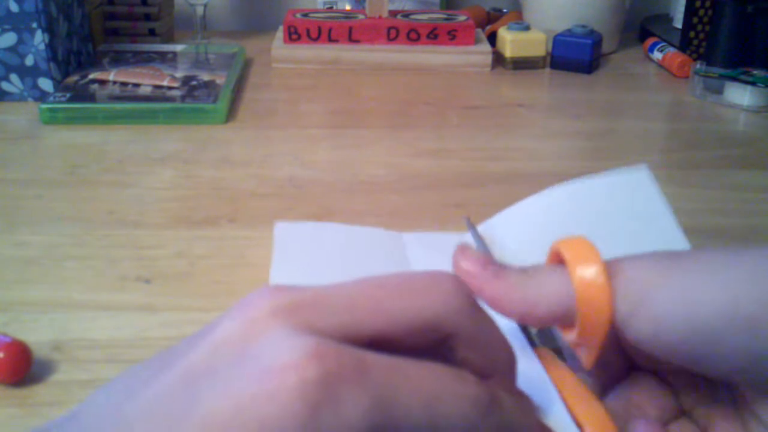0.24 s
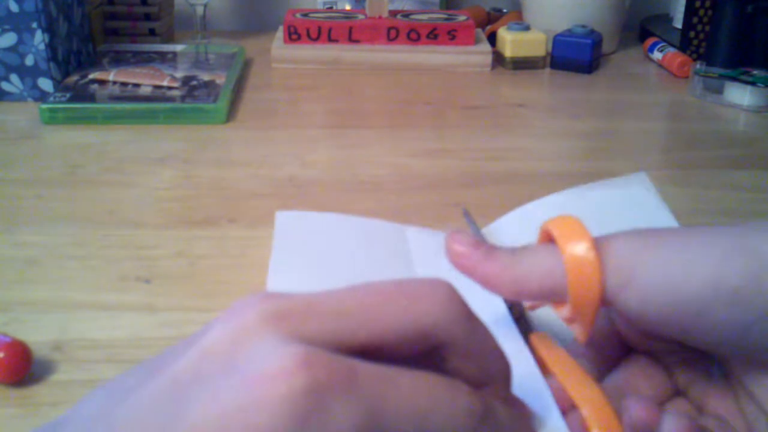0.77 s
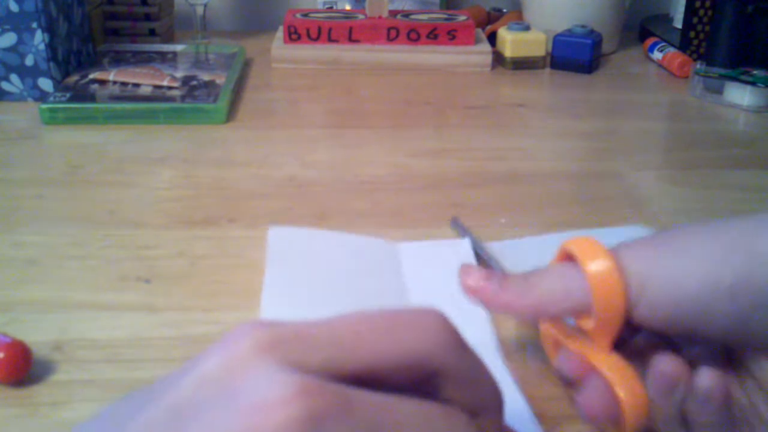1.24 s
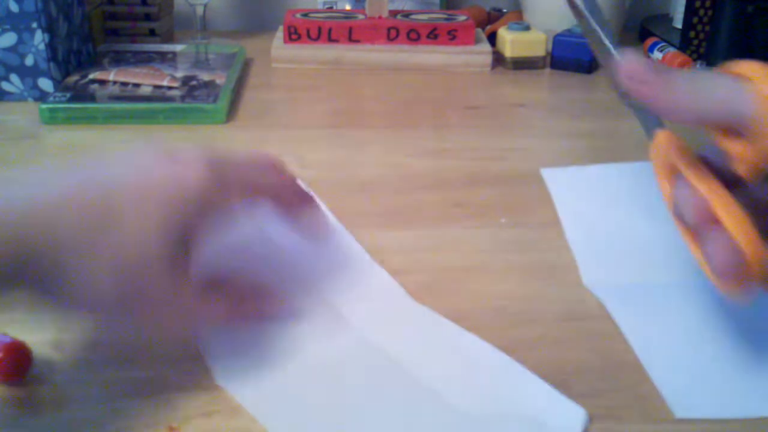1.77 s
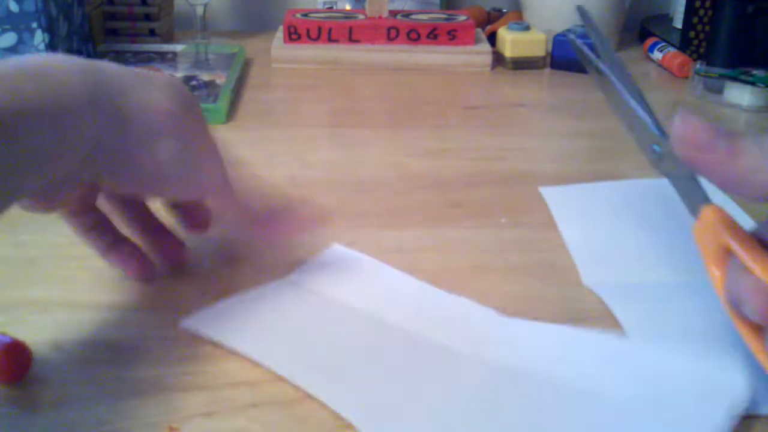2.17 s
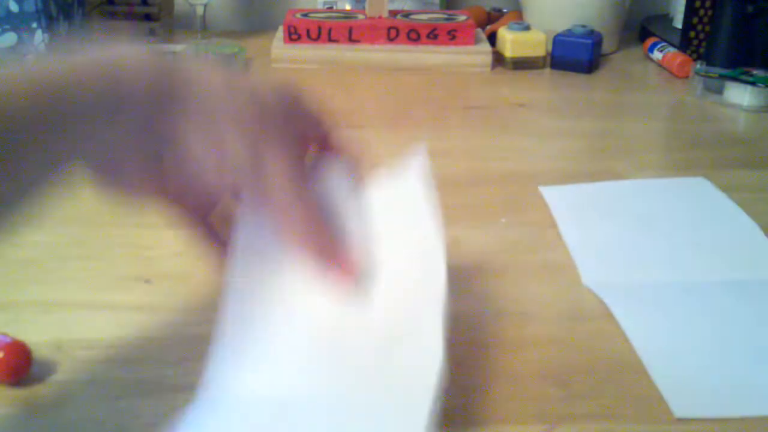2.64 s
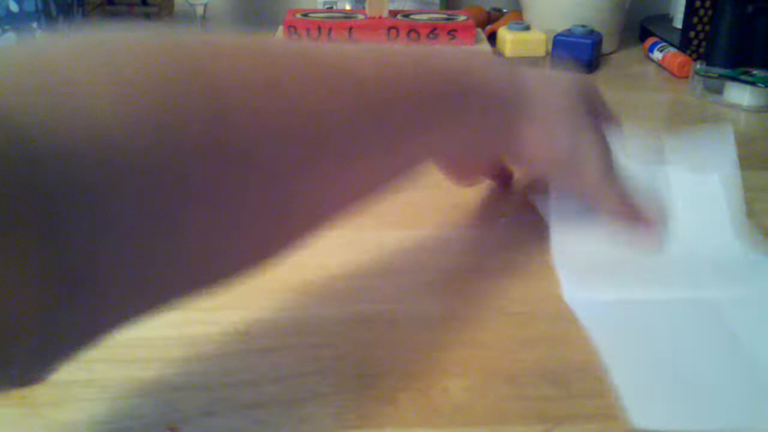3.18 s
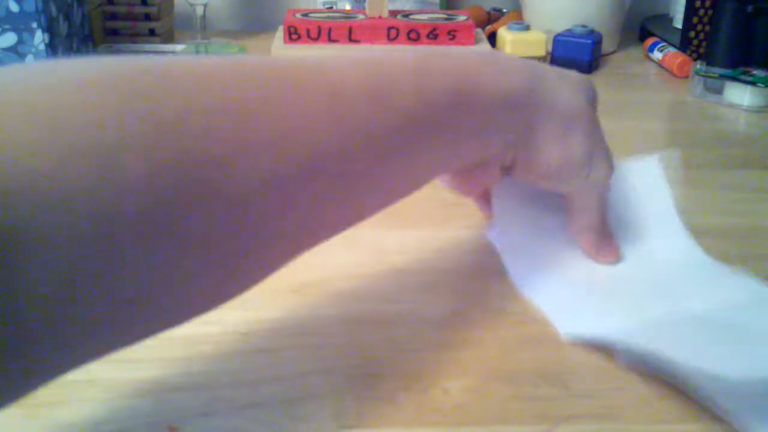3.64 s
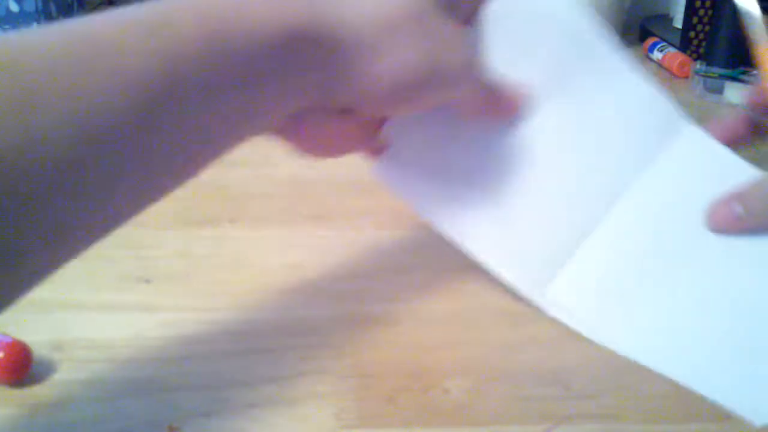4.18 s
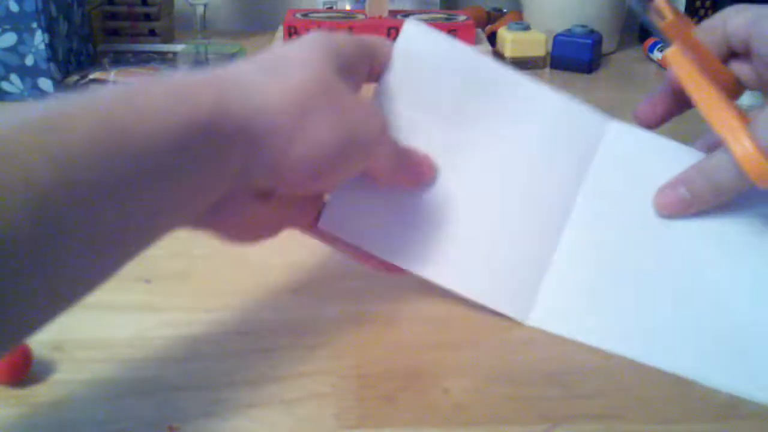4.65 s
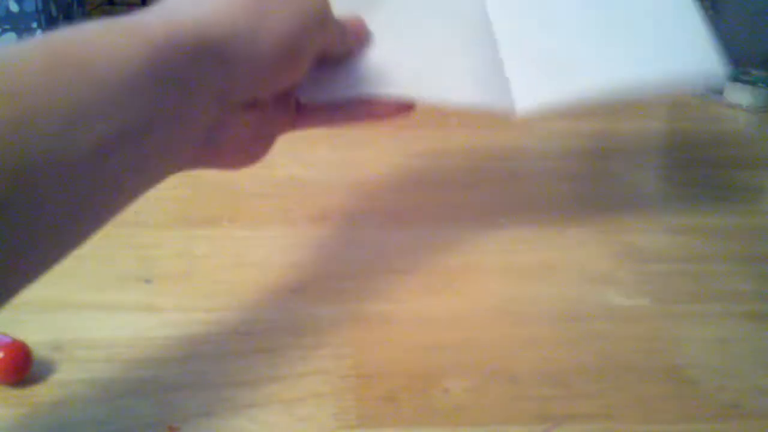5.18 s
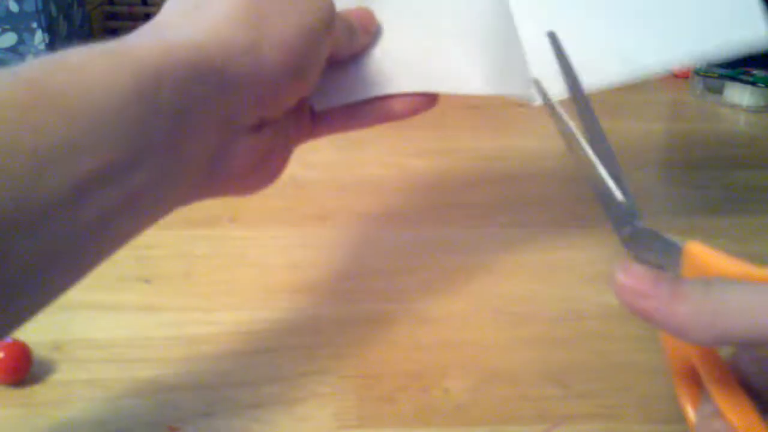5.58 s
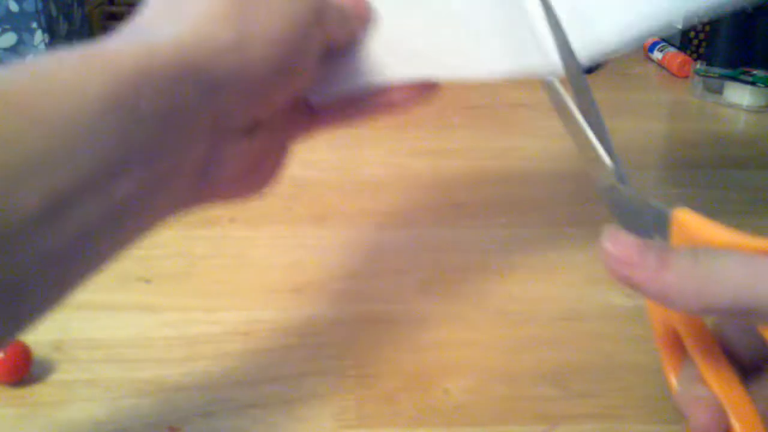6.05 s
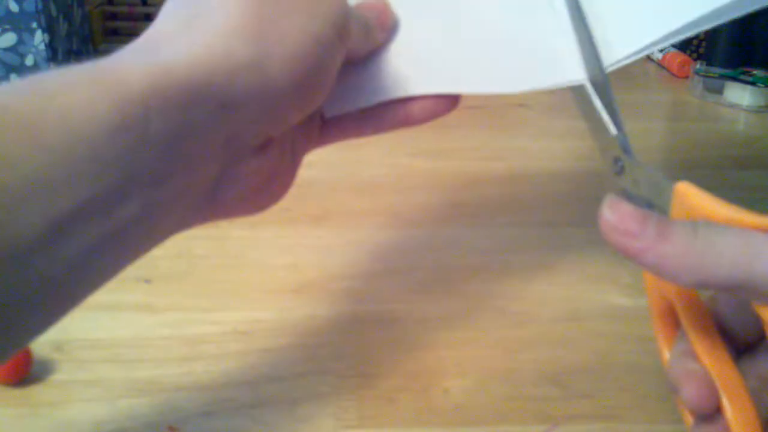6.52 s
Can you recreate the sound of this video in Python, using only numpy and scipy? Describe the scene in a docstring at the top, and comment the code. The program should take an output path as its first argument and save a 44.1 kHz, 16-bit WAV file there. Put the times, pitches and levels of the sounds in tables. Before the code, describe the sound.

Close to a small microphone in a quiet room, scissors crunch through paper four times, with sharp clicks from the blades. Paper then flaps and hisses as it is slid across a wooden table. Midway the handling grows louder, with a cluster of dull knocks, the rub of an arm and a sharp crease snap. Lighter flaps and rustles follow as the sheets are turned, fading toward a faint background hush.

```python
"""Over a faint hush, scissors make four cuts along a folded sheet on a wooden table: fibres tear and the
blades ring and bite. From about one second an arm drags on the wood, and the sheets flap and are slid,
picked up, stacked and turned; paper hisses over paper and wood, creases snap and the table is knocked.
A small close microphone is spread to two channels: the right is roughly the left, inverted and late."""
import sys
import numpy as np
from scipy import signal
from scipy.fft import rfft, irfft, next_fast_len
from scipy.io import wavfile
from scipy.ndimage import uniform_filter1d

SR = 44100
rng = np.random.default_rng(int(sys.argv[2]) if len(sys.argv) > 2 else 0)


def transcribe(u):
    """Save the signal u as a 16-bit wav file named by the first command-line argument.

    u: samples, shape (n,) or (channels, n), limited to [-1, 1]; the rate is SR.
    q: integer samples, one column per channel.
    """
    v = np.clip(np.atleast_2d(u).T, -1, 1)
    q = np.round(v * 32767).astype(np.int16)
    wavfile.write(sys.argv[1], SR, q)


N = 299880


def from_db(db):
    """The decibel scale: amplitude grows tenfold every 20 dB."""
    return 10 ** (np.asarray(db) / 20)


def unit_rms(x):
    """Normalisation to a mean power of 1."""
    return x / np.sqrt(np.mean(x ** 2) + 1e-20)


def band_pass(x, low_hz, high_hz):
    """Butterworth filtering: frequencies outside the band fall away."""
    edges = np.clip([low_hz, high_hz], 10, .45 * SR)
    return signal.sosfilt(signal.butter(2, edges, "band", fs=SR, output="sos"), x)


def drift(time_s):
    """Low-passed noise: a slow random fluctuation of rms 1."""
    pole = np.exp(-1 / (time_s * SR))
    return unit_rms(signal.lfilter([1], [1, -2 * pole, pole * pole], rng.standard_normal(N + 8000))[8000:])


def resonate(x, modes, wander_db=0):
    """Modal superposition: damped resonances add with alternating signs; their strengths may wander."""
    out = 0
    for k, (hz, width_hz, db) in enumerate(modes):
        r = np.exp(-np.pi * width_hz / SR)
        level_db = db + wander_db * drift(time_s=0.018) if wander_db else db
        poles = [2, -4 * r * np.cos(2 * np.pi * hz / SR), 2 * r * r]
        out = out + (-1) ** k * from_db(level_db) * signal.lfilter([1 - r * r, 0, r * r - 1], poles, x)
    return out


def texture(force, modes, low_hz, high_hz):
    """Forced vibration at steady power: each mode swells and sinks on its own as the sheet bends."""
    rung = band_pass(resonate(force, modes, wander_db=2.5), low_hz, high_hz)
    power = uniform_filter1d(np.mean(rung ** 2, axis=0), round(0.038 * SR))
    return rung / np.sqrt(np.maximum(power, 1e-20))


def grains(per_s, spread_db, clump_db, clump_s):
    """Shot noise: two trains of random clicks of either sign, their uneven sizes swelling in clumps."""
    size_db = spread_db * np.minimum(rng.standard_exponential((2, N)), 4) + clump_db * drift(clump_s)
    chance = rng.uniform(-1, 1, (2, N))
    born = np.abs(chance) < per_s / SR
    return np.where(born, np.sign(chance) * from_db(size_db), 1e-18)


def strokes(rows, swell_db):
    """Incoherent addition: strokes swell, hold, fade and add as power, one envelope per level column."""
    power = np.zeros((len(rows[0]) - 4, N))
    for start_s, swell_s, hold_s, fade_s, *top_db in rows:
        start = round(start_s * SR)
        # a fade of zero or less is an abrupt stop
        corners = np.cumsum(np.maximum([0, swell_s, hold_s, 3 * fade_s], 1e-3))
        t = np.arange(min(round(corners[-1] * SR), N - start)) / SR
        shape = from_db(np.interp(t, corners, [-swell_db, 0, 0, -60]))
        power[:, start:start + len(t)] += np.outer(from_db(top_db), shape) ** 2
    return np.sqrt(power)


# The noise floor. Each row: frequency in Hz, relative spectral density in dB.
HUSH_SPECTRUM = [(20, -20), (50, -24), (120, 5.5), (250, 0.5), (500, -5), (1000, -17), (2000, -20),
                 (3500, -21.5), (5300, -27.5), (8000, -21.5), (13500, -21.5)]
def hush():
    """Stationary noise: low room rumble and the microphone's own hiss."""
    hz = np.maximum(np.fft.rfftfreq(N, 1 / SR), 1)
    points_hz, density_db = np.transpose(HUSH_SPECTRUM)
    colour = from_db(np.interp(np.log(hz), np.log(points_hz), density_db))
    return from_db(-61) * unit_rms(irfft(colour * rfft(rng.standard_normal((2, N))), N))


# Resonances of tearing and of rubbed paper. Each row: frequency in Hz, bandwidth in Hz, gain in dB.
CRINKLE_MODES = [(2014, 760, -1.5), (2995, 890, 2), (3850, 1600, 0.5), (4350, 2800, -10)]
HISS_MODES = [(6800, 5900, -1.5), (8880, 1800, 6), (10770, 4100, 2.5), (11550, 1580, 1.5)]
def paper_noise(fibres, crinkle_gain, hiss_gain):
    """Fracture and friction: fibres crinkle, some break singly with a broad tick, and rubbing hisses."""
    breaks = unit_rms(band_pass(grains(140, 1.2, 1.0, 0.011), 950, 10400))
    crinkle = texture(fibres, CRINKLE_MODES, 1180, 13500) + from_db(-6.5) * breaks
    rubbing = grains(6000, 2.1, 1.15, 0.0074) + 0.2 * fibres
    return crinkle_gain * crinkle + hiss_gain * texture(rubbing, HISS_MODES, 4800, 19000)


FIBRE_CLICKS = dict(per_s=1100, spread_db=1.5, clump_db=1.5, clump_s=0.0039)
# Resonances of the blades. Each row: frequency in Hz, bandwidth in Hz, gain in dB.
BLADE_MODES = [(379, 148, 0.13), (620, 190, 0.89), (1130, 137, 0.96), (1290, 78, 0.29), (1390, 51, 1.5),
               (1600, 28, 2.5), (1717, 110, -0.13), (2090, 470, -2.3)]
# Bites of the scissors. Each row: start, swell and hold in seconds, then tearing, hiss and blades in dB.
BITES = [(0, 0.0008, 0.094, -50.5, -53, -48.5), (0.126, 0.002, 0.0036, -49, -47, -49),
         (0.1534, 0.0012, 0.017, -43.5, -40.5, -46.5), (0.184, .005, 0.015, -47.5, -44, -46),
         (0.2, 0.0024, 0.017, -43, -46.5, -49.5), (0.349, 0.0051, 0.025, -51.5, -55, -54),
         (0.381, 0.0024, 0.0075, -50.5, -56, -49.5), (0.399, 0.028, 0.032, -47, -45, -48.5),
         (0.486, 0.0037, 0.03, -48, -48, -51.5), (0.613, 0.0049, 0.0043, -48.5, -46.5, -49),
         (0.663, 0.054, 0.09, -60.5, -61, -72), (0.744, 0.0012, 0.016, -59, -68, -47.5),
         (0.778, 0.014, 0.034, -49, -53.5, -44.5), (0.842, 0.016, 0.067, -49.5, -53.5, -45.5),
         (0.999, 0.003, 0.0064, -47, -53, -47), (1.03, 0.026, 0.032, -40, -44.5, -41.5),
         (1.089, .003, 0.019, -61, -42, -44.5)]
def scissors():
    """Shear fracture: the same tearing fibres excite both the paper and the blades."""
    fade_s = 0.072  # per 20 dB
    rows = [(start_s, swell_s, hold_s, fade_s, *db) for start_s, swell_s, hold_s, *db in BITES]
    tear_gain, hiss_gain, blade_gain = strokes(rows, swell_db=5.5)
    fibres = grains(**FIBRE_CLICKS)
    return paper_noise(fibres, tear_gain, hiss_gain) + blade_gain * texture(fibres, BLADE_MODES, 200, 1740)


# Blades biting and creases snapping. Each row: start in seconds, peak in dB, treble share in dB.
SNAP_EVENTS = [(0.128, -30.5, 0), (0.1582, -21, -1), (0.172, -22, -3), (0.2045, -23, -11),
               (0.3545, -53, -2), (0.3868, -34, -6), (0.4867, -39, -1), (0.5105, -36, -10),
               (0.6244, -40, -10), (0.7857, -37, -4), (1.1025, -29, -1), (0.75, -45, 0), (1.002, -35, -5.5),
               (1.0337, -37, -3), (1.068, -33, -10), (1.737, -37, 4), (1.8687, -47, -9), (1.952, -24, 1.5),
               (2.148, -47.5, -6), (2.4175, -38, 1), (2.4255, -33.5, -8), (2.4543, -28.5, -20),
               (2.502, -30.5, -16), (2.561, -37, -1), (2.598, -35, 0), (2.6096, -29, -2.5),
               (2.6367, -30.5, 7), (2.706, -35, 1), (2.903, -43, 0), (2.9197, -36.5, 0), (2.942, -43, -8),
               (2.9766, -34.5, -5.5), (3.006, -44, -6), (3.1233, -35.5, -7), (3.333, -43, 5),
               (3.357, -28, -15), (3.453, -27, -19), (3.457, -29, -10), (3.5743, -41, -5),
               (3.5967, -11, -2), (3.5968, -12, -4), (3.8101, -27, -7), (3.8217, -34, -2),
               (3.8359, -31.5, -8), (4.2747, -33, -1.5), (4.285, -31.5, -0.5), (4.406, -35.5, -1),
               (5.129, -24.5, 2), (5.5154, -42.5, -3.5), (6.006, -39, 1)]
def snaps():
    """Sudden release of stress: a crack about 1 ms long, then a weaker crackling tail."""
    crack_t60_s, tail_t60_s, length = 0.0025, 0.052, 4000
    out, t = np.zeros((2, N + length)), np.arange(length) / SR
    decay = from_db(-60 * t / crack_t60_s) + from_db(-13 - 60 * t / tail_t60_s)
    for start_s, peak_db, treble_db in SNAP_EVENTS:
        burst = rng.choice([-1, 1], (2, length)) * decay
        bands = band_pass(burst, 1600, 7200), band_pass(burst, 5050, 14000)
        low, high = (band / np.linalg.norm(band, axis=1, keepdims=True) for band in bands)
        share = min(from_db(treble_db), .98)
        snap = share * high + np.sqrt(1 - share ** 2) * low
        out[:, round(start_s * SR):][:, :length] += from_db(peak_db) * snap / np.abs(snap).max()
    return out[:, :N]


# Resonances of the table top. Each row: frequency in Hz, bandwidth in Hz, gain in dB.
WOOD_MODES = [(91, 53, -2.5), (135, 60, 1), (208, 85, -4.5), (277, 122, -13.5)]
# Arm and hand dragging. Each row: start, swell, hold and fade per 20 dB in seconds, level in dB.
ARM_DRAGS = [(.99, 0.061, 0.24, 0, -53.5), (1.33, 0.048, 0.034, -0.5, -57),
             (1.48, 0.023, 0.16, -1.2, -52.5), (1.7, 0.21, 0.063, 0.1, -60), (2.26, 0.018, 0.046, 1, -57),
             (3.34, 0.017, 0.077, 0.33, -42.5), (3.47, .02, 0.074, 0.14, -42),
             (3.69, 0.012, 0.024, 1.5, -62), (4.07, 0.072, 0.11, -0.46, -49.5),
             (4.4, 0.044, 0.4, -0.8, -65)]
# Knocks on the wood. Each row: time in seconds, peak in dB.
WOOD_KNOCKS = [(1.184, -38), (1.242, -39), (1.265, -50), (1.383, -44), (1.515, -34), (1.621, -43),
               (3.309, -27), (3.330, -22), (3.371, -34), (3.393, -27), (3.417, -29), (3.446, -31),
               (3.601, -36), (3.626, -38), (3.705, -42), (4.151, -38)]
def table_top():
    """Stick-slip friction of skin drives the wood in soft lumps; each knock is an impulse response."""
    slips = grains(300, 1.0, 2.6, 0.0094)
    drags = strokes(ARM_DRAGS, swell_db=4)[0] * unit_rms(resonate(slips, WOOD_MODES))
    pushes = np.full(N, 1e-18)
    for start_s, peak_db in WOOD_KNOCKS:
        pushes[round(start_s * SR)] = from_db(peak_db)
    impulse_response = resonate(signal.unit_impulse(2000), WOOD_MODES)
    knocks = resonate(pushes, WOOD_MODES) / np.abs(impulse_response).max()
    return band_pass(drags + knocks, 21, 610)


# The sheet flapping or tapping the table. Each row: start in seconds, peak in dB, pitch in Hz,
# tail against the push in dB.
FLAP_EVENTS = [(1.13, -29.5, 590, -5), (1.147, -28, 483, -11), (1.156, -28, 540, -8.5),
               (1.182, -36, 695, -7), (2.271, -34, 353, -8.5), (2.374, -39.5, 360, -8),
               (2.609, -33, 1060, -10), (2.672, -44, 500, -13), (2.742, -46, 604, -9),
               (2.775, -40.5, 646, -10), (2.954, -41, 430, -24), (2.9756, -23.5, 710, -11.5),
               (3.357, -41, 905, -5), (3.156, -40, 410, 9), (3.809, -42, 670, 3), (3.997, -35, 390, 2),
               (4.036, -40.5, 610, -6), (4.066, -39.5, 528, -4.5), (4.206, -35, 410, -3),
               (4.455, -43, 370, -8), (4.631, -35.5, 530, -10), (4.813, -40, 313, -18),
               (5.129, -41.5, 720, -28), (5.636, -43, 413, -6), (5.721, -53, 490, 1),
               (6.019, -49.5, 375, -10), (6.244, -44, 440, -12)]
def flaps():
    """Impulsive excitation: a push and a rustle ring the sheet at its momentary pitch and above."""
    push_t60_s, tail_t60_s, tail_rise_s, length = 0.0027, 0.13, 0.0024, 5000
    out, t = np.zeros((2, N + length)), np.arange(length) / SR
    push = from_db(-60 * t / push_t60_s)
    for start_s, peak_db, hz, tail_db in FLAP_EVENTS:
        tail = from_db(tail_db - 60 * t / tail_t60_s) * (1 - np.exp(-t / tail_rise_s))
        force = push + tail * rng.standard_normal((2, length))
        modes = [(hz, 0.43 * hz, 0), (1.87 * hz, 0.59 * hz, -3), (2.0 * hz, 1.72 * hz, -9)]
        flap = band_pass(resonate(force, modes), 180, 5000)
        out[:, round(start_s * SR):][:, :length] += from_db(peak_db) * flap / np.abs(flap).max()
    return out[:, :N]


# Resonances of the whole sheet. Each row: frequency in Hz, bandwidth in Hz, gain in dB.
SHEET_MODES = [(296, 160, -3), (404, 57, 3.5), (471, 107, -1.5), (720, 120, -5), (923, 620, -11),
               (1145, 1060, -10.5)]
# Sheets slid, lifted and turned. Each row: start, swell, hold and fade per 20 dB in seconds,
# then crinkle, hiss and sheet body in dB.
HAND_STROKES = [ (1.16, 0.049, 0.2, 0.36, -64.5, -63.5, -56), (1.26, .11, 0.008, 0.14, -52.5, -47.5, -66),
                (1.735, 0.0024, 0.013, 0.04, -59.5, -46, -73), (1.86, 0.07, 0.025, 0.08, -58, -41.5, -49),
                (1.98, 0.016, 0.064, 0.16, -78, -61.5, -84), (2.271, 0.0019, 0.017, 0.2, -66, -67.5, -50.5),
                (2.418, 0.0042, 0.018, 0.28, -55, -51.5, -50.5),
                (2.448, 0.0046, 0.055, 0.1, -54, -43.5, -53.5),
                (2.61, 0.00091, 0.0044, 0.03, -47, -54, -44.5),
                (2.63, 0.0092, 0.031, 0.1, -60, -60.5, -57.5), (2.7, 0.0034, 0.033, 0.23, -77, -68, -52.5),
                (2.77, 0.05, 0.1, -7, -73, -63, -70), (2.925, 0.012, 0.0037, 0.34, -59.5, -61.5, -48.5),
                (2.983, 0.025, 0.02, 0.57, -65, -54, -54), (3.08, 0.061, 0.012, 0.05, -52, -44, -63),
                (3.19, 0.068, 0.076, 0, -53, -50.5, -57), (3.3, 0.034, 0.031, 0.08, -43, -39, -47.5),
                (3.39, 0.043, 0.034, -0.02, -40, -39.5, -47.5),
                (3.47, 0.038, 0.048, 0.01, -49.5, -49, -56.5),
                (3.565, 0.0097, 0.038, -0.01, -45, -42.5, -56),
                (3.6, 0.0016, 0.013, 0.1033, -44.5, -42.5, -49),
                (3.7, 0.086, 0.024, 0.44, -56.5, -50.5, -58), (3.81, 0.0011, 0.024, 0.01, -46, -60, -42),
                (3.86, 0.089, 0.026, 0.094, -52.5, -41, -51.5), (4.02, 0.017, 0.12, 0.16, -64.5, -55, -60),
                (4.13, 0.036, 0.031, 0.19, -63.5, -53.5, -59),
                (4.274, 0.0012, 0.026, 0.08, -62, -51.5, -52.5),
                (4.405, 0.0017, 0.13, 0.37, -67.5, -59, -58),
                (4.61, 0.0042, 0.0067, 0.15, -71, -57.5, -49.5),
                (4.72, 0.041, 0.036, 0.15, -67.5, -60.5, -62), (4.87, 0.071, 0.045, 0.6, -77.5, -76, -61.5),
                (5.132, 0.0022, 0.045, -0.31, -66, -60.5, -69), (5.5, 0.014, 0.0088, 0.08, -73, -67.5, -58),
                (5.59, 0.038, 0.054, 0, -70, -62, -55), (5.71, 0.01, 0.0079, 0.09, -87, -75, -55),
                (6.005, 0.0043, 0.085, 0.16, -69.5, -59.5, -62.5),
                (6.16, 0.054, .03, 0.1, -73.5, -68, -58.5), (6.31, 0.042, 0.046, 0.1, -68, -64, -57),
                (6.4, 0.035, 0.026, 0.09, -67, -60, -56.5), (6.68, 0.046, 0.024, 0, -72, -67, -82.5)]
def sliding_sheets():
    """Sliding friction: handled paper crinkles, hisses and vibrates in its low modes."""
    crinkle_gain, hiss_gain, body_gain = strokes(HAND_STROKES, swell_db=23.5)
    body = texture(grains(2000, 2.55, 3.2, 0.016), SHEET_MODES, 140, 1540)
    return paper_noise(grains(**FIBRE_CLICKS), crinkle_gain, hiss_gain) + body_gain * body


# The stereo image. Each row: frequency in Hz, correlation of the late copy with the sound,
# weight from -1 to 1 of that same pair in the side signal, side gain for the paper in dB.
STEREO_IMAGE = [(60.5, 0.99, 0.96, 21), (217, 0.97, 1, -22), (427, 0.88, 0.29, -21), (850, 1, -0.39, -2),
                (1500, 0.92, 0.32, -2.5), (2690, 1, 0.53, 0.5), (4450, 0.5, 0.89, -4), (4880, 1, 1, -2.5),
                (6640, 0.33, 0.99, 0), (13000, 0.74, 1, -1)]
def spread(pair, trim_side):
    """Comb filtering: mid is the sound minus a late copy; side is their sum, blended with a second draw."""
    lag_samples, size = 17, next_fast_len(N + 2048)
    hz = np.maximum(np.fft.rfftfreq(size, 1 / SR), 1)
    points_hz, *columns = np.transpose(STEREO_IMAGE)
    correlation, weight, side_db = (np.interp(np.log(hz), np.log(points_hz), c) for c in columns)
    first, second = rfft(pair, size)
    delay = np.exp(-2j * np.pi * hz * lag_samples / SR)
    late_copy = delay * (correlation * first + np.sqrt(1 - correlation ** 2) * second)
    mid = first - late_copy
    side = weight * (first + late_copy) + np.sqrt(1 - weight ** 2) * second * (1 + delay)
    if trim_side:
        side *= from_db(side_db)
    return irfft(np.array([mid + side, mid - side]), size)[:, :N] / 2


def scene():
    """Superposition: the paper's low mids stay near the centre; hush and table keep their full width."""
    paper = scissors() + snaps() + flaps() + sliding_sheets()
    return spread(paper, trim_side=True) + spread(hush() + table_top(), trim_side=False)


def record(dry):
    """Band limiting: a steep treble cut, then a slight imbalance and opposite steady offsets."""
    cutoff_hz, balance_db, offset = 14000, 0.1, 0.0012
    low_pass = np.vstack([signal.cheby2(12, 30, cutoff_hz * 1.02, fs=SR, output="sos"),
                          signal.butter(14, cutoff_hz * 1.1, fs=SR, output="sos")])
    left_right = np.array([[1], [-1]])
    return signal.sosfilt(low_pass, dry) * from_db(balance_db * left_right) + offset * left_right


dry = scene()
out = record(dry)
transcribe(out)
```